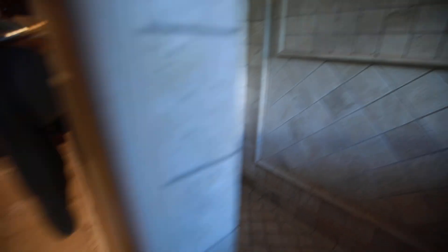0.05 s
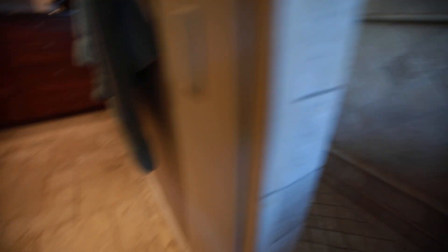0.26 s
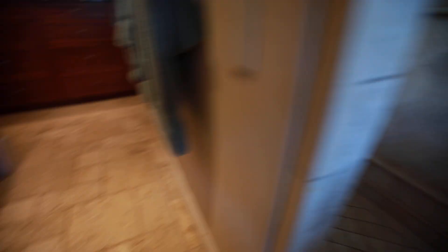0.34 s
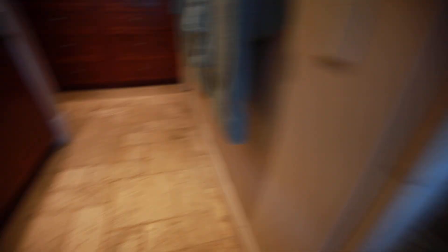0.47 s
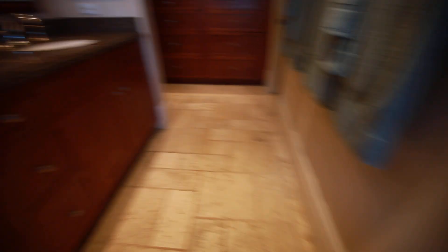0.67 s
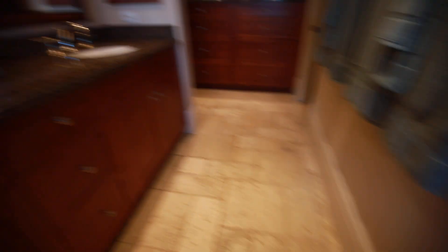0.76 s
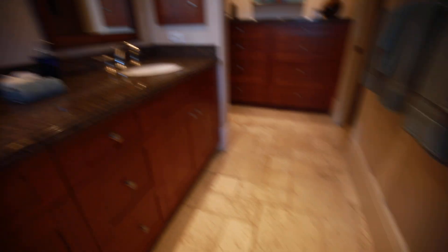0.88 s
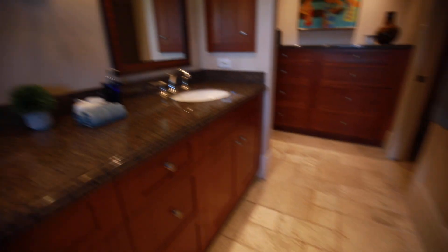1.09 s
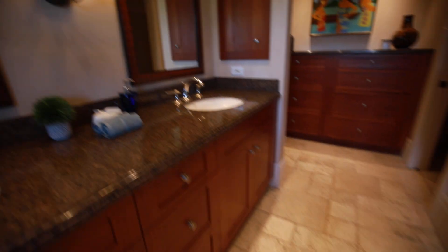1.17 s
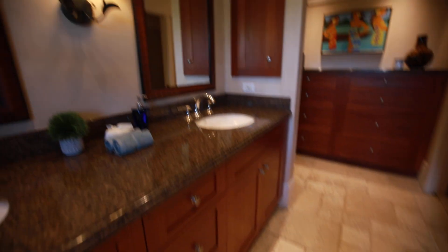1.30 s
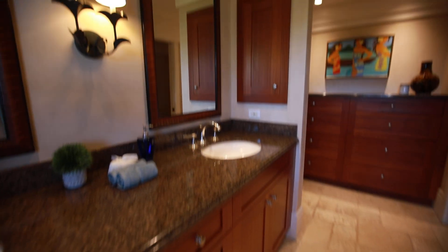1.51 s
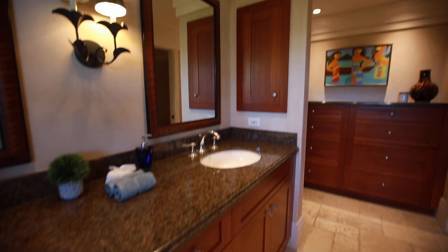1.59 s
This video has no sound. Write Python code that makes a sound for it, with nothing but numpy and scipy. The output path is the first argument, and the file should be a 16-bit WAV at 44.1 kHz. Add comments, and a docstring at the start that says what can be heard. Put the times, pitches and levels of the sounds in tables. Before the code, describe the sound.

A short, high shoe squeak on tile rings briefly in a bathroom.

```python
"""A rubber sole pivots on bathroom tiles: it scuffs, sings thinly, then sticks and slips in one short
falling squeak. The singing and the squeak ring off the hard walls. The walk goes on with a soft
step and a swish of clothing. Underneath lie the moving air and fan tones of the ventilation, low
hums that swell and pass, and the rumble of the carried microphone."""
import sys
import numpy as np
from scipy import signal
from scipy.fft import rfft, irfft
from scipy.io import wavfile

SR = 44100
rng = np.random.default_rng(int(sys.argv[2]) if len(sys.argv) > 2 else 0)


def waveform_to_disk(signal):
    """Save audio, clipped to [-1, 1], as 16-bit WAV at the path in sys.argv[1]."""
    frames = np.transpose(np.atleast_2d(signal))
    scaled = np.clip(frames, -1, 1) * 32767
    samples = np.round(scaled).astype(np.int16)
    wavfile.write(sys.argv[1], SR, samples)


N = 72765
T = np.arange(N) / SR
BIN_HZ = np.arange(N // 2 + 1) * SR / N


def from_db(db):
    """Decibels to gain."""
    return 10 ** (np.asarray(db) / 20)


def rms_one(x):
    """Scale to rms 1."""
    return x / np.sqrt(np.mean(x ** 2) + 1e-20)


def at_hz(points, hz):
    """Read a table on a log-frequency axis."""
    f, value = np.transpose(points)
    return np.interp(np.log(np.maximum(hz, 1)), np.log(f), value)


def pan(db):
    """Stereo gains that put the left db above the right."""
    return from_db(np.array([[db], [-db]]) / 2)


def drift(rate_hz):
    """Smooth random wander of spread 1, with nothing much faster than its rate."""
    lowpass = signal.butter(4, rate_hz, fs=SR, output="sos")
    return rms_one(signal.sosfilt(lowpass, rng.standard_normal(2 * N))[N:])


def gate(start_s, end_s, attack_s, release_s):
    """Linear attack, hold, exponential release."""
    return np.clip((T - start_s) / attack_s, 0, 1) * np.exp(-np.maximum(T - end_s, 0) / release_s)


def swell(peak_s, rise_s, fall_s):
    """A bell-shaped envelope with its own rise and fall."""
    return np.exp(-((T - peak_s) / np.where(T < peak_s, rise_s, fall_s)) ** 2 / 2)


def phase_of(hz):
    """Running phase of a pitch curve."""
    return 2 * np.pi * np.cumsum(hz) / SR


def tone(hz, jitter, rate_hz):
    """A sine of rms 1 whose pitch wavers by the fraction jitter."""
    wavering_hz = hz * (1 + jitter * drift(rate_hz))
    return np.sqrt(2) * np.sin(phase_of(wavering_hz) + rng.uniform(0, 2 * np.pi))


def stereo_spectrum(correlation):
    """Spectra of two white noises with a given correlation."""
    mid, side = rfft(rng.standard_normal((2, N)))
    return (np.sqrt(1 + correlation) * mid + np.sqrt(1 - correlation) * side * [[1], [-1]]) / np.sqrt(2)


# Stereo image of the noises. Each row: frequency in Hz, left-right correlation.
STEREO_IMAGE = [(30, 0.16), (200, 0.24), (600, 0.51), (2000, 0.64), (5000, 0.26), (9000, 0.021),
                (15000, 0.02)]

def noise(colour, tilt_db=0):
    """Coloured stereo noise of rms about 1, leaning left, tilted by tilt_db per octave above 500 Hz."""
    gain = from_db(at_hz(colour, BIN_HZ) + tilt_db * np.log2(np.maximum(BIN_HZ, 500)))
    white = stereo_spectrum(at_hz(STEREO_IMAGE, BIN_HZ))
    return pan(2.03) * rms_one(irfft(gain * white, N))


# The air bed's EQ. Each row: frequency in Hz, relative level in dB.
AIR_EQ = [(30, -28), (70, -3), (150, -2.5), (300, 2), (600, 0), (1200, -6.5), (2500, -10), (5000, -14),
          (9000, -17), (15500, -20)]
# Faint fan tones. Each row: pitch in Hz, level in dB.
FAN_TONES = [(706, -68), (600, -73.5), (298, -68.5), (351.3, -66)]

def ventilation():
    """Moving air makes a slowly fading bed of noise, with the fan's steady tones in it."""
    air = from_db(-49.5 - 0.54 * T) * noise(AIR_EQ)
    fan = sum(from_db(db) * tone(hz, jitter=0.004, rate_hz=3.7) for hz, db in FAN_TONES)
    return air + fan


# Brief hums. Each row: start and end in seconds, pitch in Hz, level in dB, left over right in dB.
HUMS = [(0.0, 0.081, 700, -56.5, 0), (0.14, 0.34, 505, -61.5, 0), (0.75, 0.9, 285, -58, 11)]
# The deepest hum's two swells. Each row: start and end in seconds, level in dB, left over right in dB.
DRONE_SWELLS = [(0.767, 1.11, -56.5, -16.5), (1.178, 1.277, -56, -8)]

def passing_hums(drone_hz=221):
    """Low, wavering room tones swell and fade along the way."""
    drones = [(start, end, drone_hz, db, side_db) for start, end, db, side_db in DRONE_SWELLS]
    hums = 0
    for start, end, hz, db, side_db in HUMS + drones:
        level = from_db(db) * gate(start, end, attack_s=0.038, release_s=0.056)
        hums += pan(side_db) * level * tone(hz, jitter=0.02, rate_hz=45)
    return hums


# The rumble's sub-bass EQ. Each row: frequency in Hz, relative level in dB.
RUMBLE_EQ = [(18, -7.5), (30, 9), (42, 4), (65, -24.5), (130, -45), (400, -77)]
# Handling bumps. Each row: peak time in seconds, boost in dB.
BUMPS = [(0.18, 5.8), (1.24, 6)]

def handling():
    """The carried microphone rumbles, more at each footfall."""
    boost_db = sum(db * swell(peak, rise_s=0.04, fall_s=0.04) for peak, db in BUMPS)
    return pan(2.5) * from_db(-58 + boost_db) * noise(RUMBLE_EQ)


# Soft swishes. Each row: peak time in seconds, level in dB, rise and fall in seconds,
# tilt in dB per octave.
SWISHES = [(0.21, -47.5, 0.12, 0.16, 1.5), (0.55, -50, 0.039, 0.059, -2.5), (1.17, -50, 0.089, 0.11, 2)]
# Their shared EQ. Each row: frequency in Hz, relative level in dB.
SWISH_EQ = [(100, -15.5), (400, -3), (900, 3), (1900, -3), (3500, -3.5), (6200, -4.5), (8000, -8.5),
            (11000, -15), (15500, -15)]

def rubbing():
    """Soles and clothing brush in soft swells of friction noise."""
    return sum(from_db(db) * swell(peak, rise, fall) * noise(SWISH_EQ, tilt_db)
               for peak, db, rise, fall, tilt_db in SWISHES)


# The scuff's peaky EQ. Each row: frequency in Hz, relative level in dB.
SCUFF_EQ = [(500, -4), (1400, -7.5), (1900, 3.5), (2400, -1.5), (3200, 4), (4200, 0.5), (5300, 6),
            (6300, -1), (8000, -11), (11000, -9), (15500, -11)]

def scuff():
    """Rubber hisses as it slides over the tile."""
    return from_db(-44) * gate(0.08, 0.18, attack_s=0.053, release_s=0.081) * noise(SCUFF_EQ)


def singing(start_s=0.114, sag_hz_per_s=1300):
    """A faint, rough, high squeal sags a little while the sole still slides lightly."""
    hz = 5590 - sag_hz_per_s * (T - start_s)
    flutter_db = 3 * drift(rate_hz=70)
    level = from_db(-48 + flutter_db) * gate(start_s, end_s=0.15, attack_s=0.0031, release_s=0.06)
    return level * tone(hz, jitter=0.018, rate_hz=200)


# The grip's bright EQ. Each row: frequency in Hz, relative level in dB.
GRIP_EQ = [(1000, -16.5), (3500, -10), (5300, 4.5), (6400, 0.5), (7500, -8), (10000, -2.5), (12000, -19),
           (14200, -7), (15800, -23)]

def grip():
    """The friction hiss flares brightly as the sole grips."""
    return from_db(-34.5) * swell(peak_s=0.24, rise_s=0.033, fall_s=0.024) * noise(GRIP_EQ)


# The squeak's contour. Each row: time in seconds, pitch in Hz, level in dB.
SQUEAK_CONTOUR = [(0.22, 5200, -35), (0.2226, 5010, -13.5), (0.227, 4735, -15.5), (0.2313, 4443, -15.5),
                  (0.235, 4216, -17.5), (0.241, 4474, -10.5), (0.249, 4328, -16.5), (0.26, 4391, -17.5),
                  (0.274, 4356, -30.5), (0.291, 4290, -22)]
# Its edge. Each row: harmonic number, level against the fundamental in dB, left over right in dB.
SQUEAK_OVERTONES = [(2, -14, 1), (3, -28.5, -1)]

def squeak(settle_s=0.12, overtone_build_s=0.0089):
    """The sole sticks and slips thousands of times a second, slowing and steadying under the weight."""
    times, pitches, levels = np.transpose(SQUEAK_CONTOUR)
    age = np.maximum(T - times[0], 0)
    jitter = 0.0095 * np.exp(-age / settle_s) * drift(rate_hz=280)
    phase = phase_of(np.interp(T, times, pitches) * (1 + jitter))
    shimmer_db = 1.3 * drift(rate_hz=280)
    sounding = (T > times[0]) & (T < times[-1])
    level = from_db(np.interp(T, times, levels) + shimmer_db) * sounding
    edge = np.clip(age / overtone_build_s, 0, 1)
    overtones = sum(pan(side_db) * from_db(db) * np.sin(harmonic * phase)
                    for harmonic, db, side_db in SQUEAK_OVERTONES)
    return np.sqrt(2) * level * (np.sin(phase) + edge * overtones)


# The tiled room's tail. Each row: frequency in Hz, time to fall 60 dB in seconds.
ROOM_T60 = [(500, 0.36), (4400, 0.62), (9000, 0.5), (13000, 0.46)]
# Early reflections. Each row: delay in seconds, level against the direct sound in dB,
# left over right in dB.
REFLECTIONS = [(.0025, -8, 2), (.0056, -7, -21), (0.0092, -8.5, 7)]

def bathroom(dry, build_s=0.088, stall_t60_s=0.28):
    """Direct sound, a few hard reflections, the shower stall's quick ring and a later, bright tail."""
    white = stereo_spectrum(correlation=0.23)
    edges_hz = np.linspace(0, SR / 2, 13)
    tail = 0
    for low, high in zip(edges_hz, edges_hz[1:]):
        band = irfft(white * ((BIN_HZ >= low) & (BIN_HZ < high)), N)
        tail += band * from_db(-60 * T / at_hz(ROOM_T60, (low + high) / 2))
    tail *= 1 - np.exp(-T / build_s)
    stall = irfft(stereo_spectrum(at_hz(STEREO_IMAGE, BIN_HZ)), N) * from_db(-60 * T / stall_t60_s)
    response = (from_db(-3.5) * rms_one(tail) + from_db(-3) * rms_one(stall)) / np.sqrt(N)
    direct = from_db(-2.5)
    response[:, 0] += direct
    for delay, db, side_db in REFLECTIONS:
        response[:, int(delay * SR)] += direct * from_db(db) * pan(side_db)[:, 0]
    return pan(3) * signal.fftconvolve(dry, response, axes=1)[:, :N]


# The step's dark EQ. Each row: frequency in Hz, relative level in dB.
STEP_EQ = [(30, -3), (70, -6), (150, -1), (300, 3), (700, -13), (2000, -58)]

def footfall(start_s=1.2, attack_s=0.017):
    """A foot lands softly with a dull thud."""
    return from_db(-51.5) * gate(start_s, start_s + attack_s, attack_s, release_s=0.056) * noise(STEP_EQ)


def scene():
    """The squeak and singing ring in the tiled room; the walk's noises and the background stay dry."""
    ringing = bathroom(squeak() + singing())
    walk = scuff() + grip() + rubbing() + footfall()
    background = ventilation() + passing_hums() + handling()
    return ringing + walk + background


def record(dry, cutoff_hz=15850):
    """A steep low-pass takes off the very top."""
    return signal.sosfilt(signal.ellip(12, 0.1, 90, cutoff_hz, fs=SR, output="sos"), dry)


dry = scene()
out = record(dry)
waveform_to_disk(out)
```